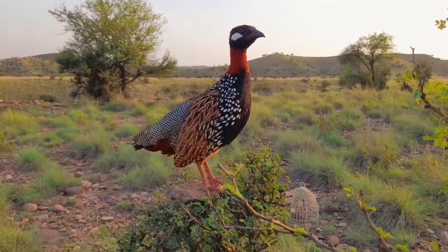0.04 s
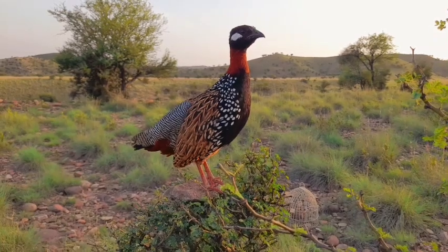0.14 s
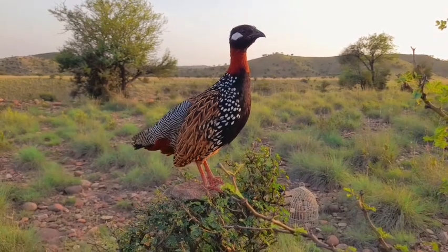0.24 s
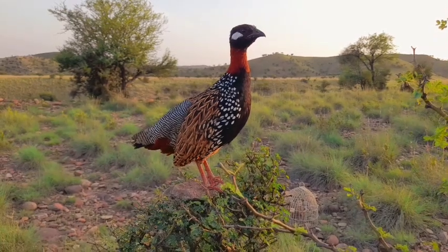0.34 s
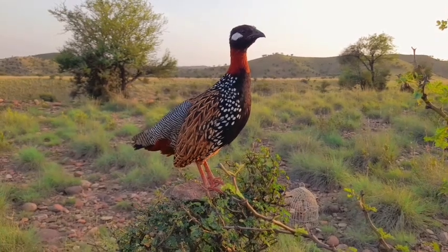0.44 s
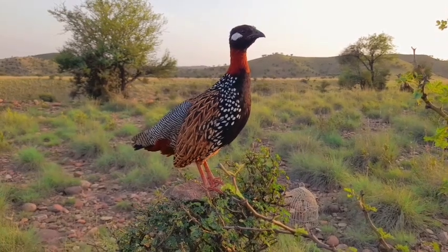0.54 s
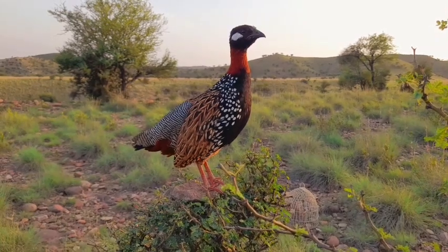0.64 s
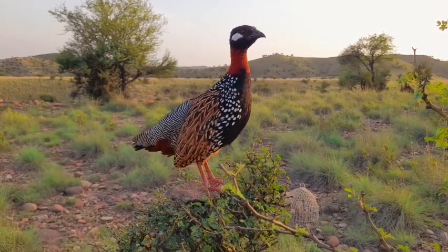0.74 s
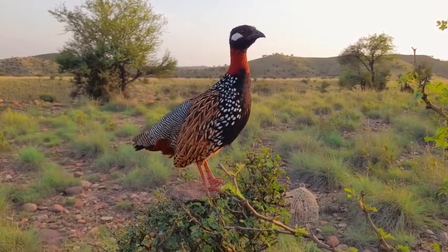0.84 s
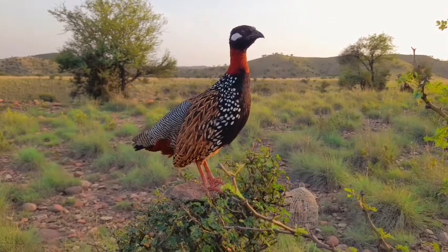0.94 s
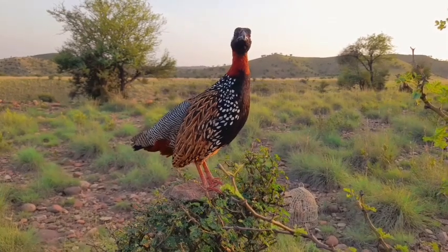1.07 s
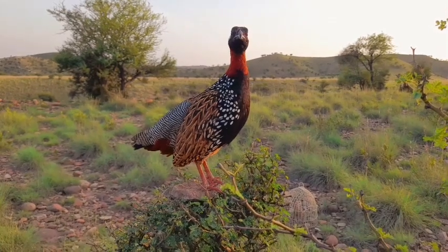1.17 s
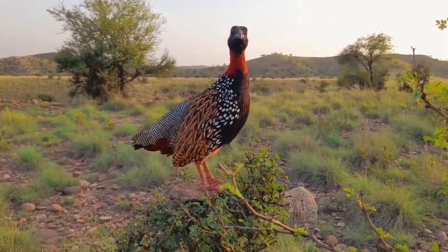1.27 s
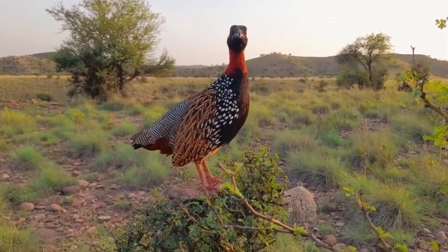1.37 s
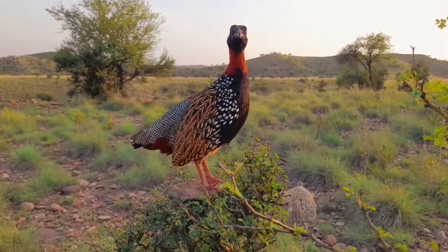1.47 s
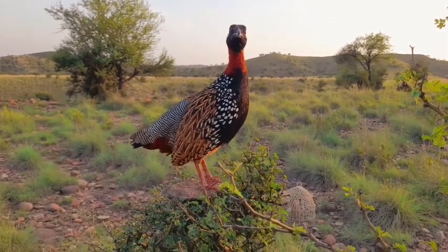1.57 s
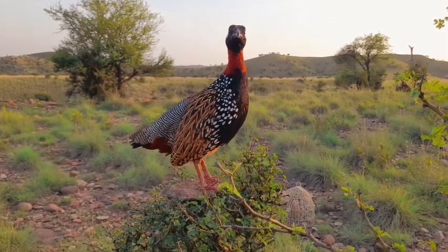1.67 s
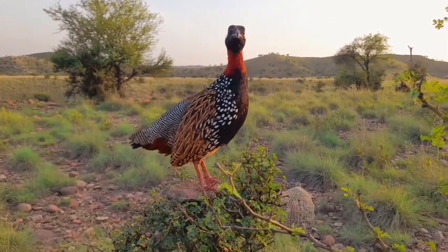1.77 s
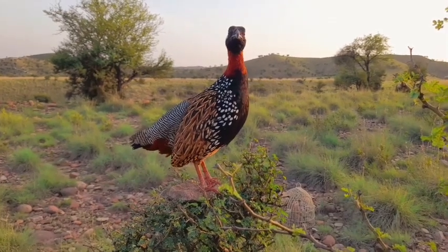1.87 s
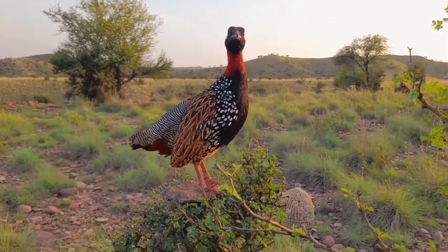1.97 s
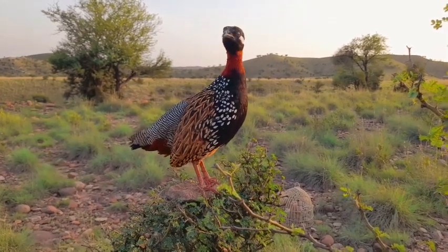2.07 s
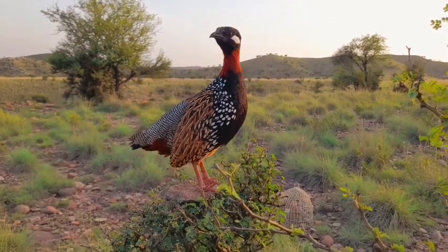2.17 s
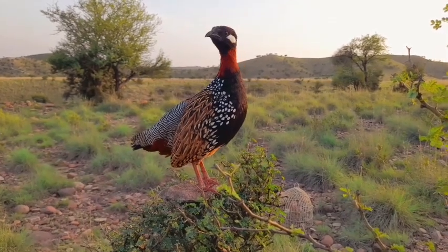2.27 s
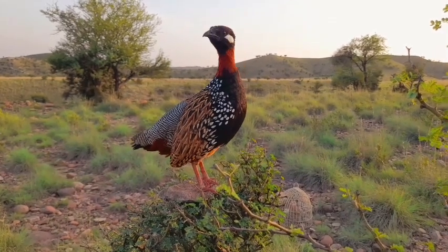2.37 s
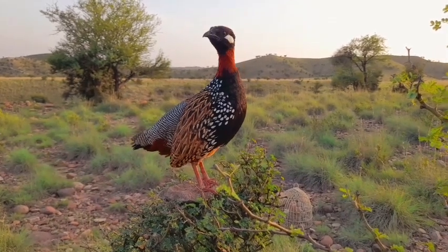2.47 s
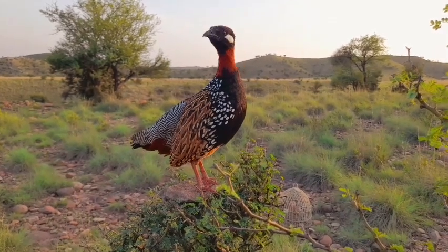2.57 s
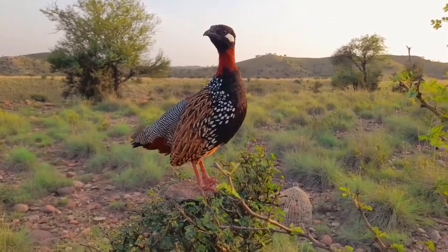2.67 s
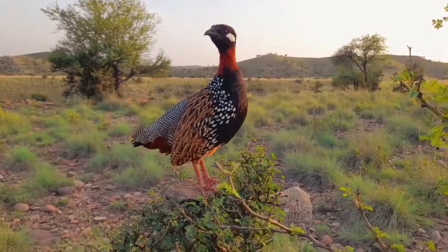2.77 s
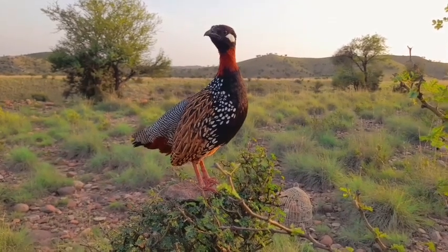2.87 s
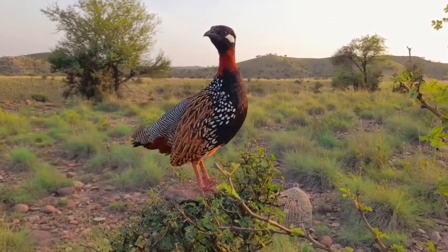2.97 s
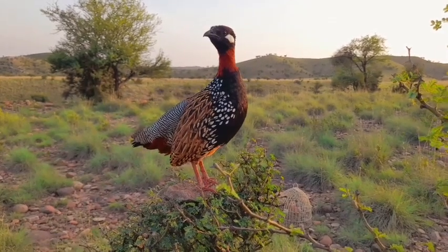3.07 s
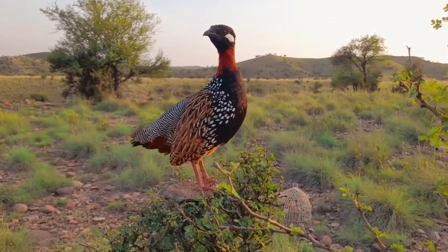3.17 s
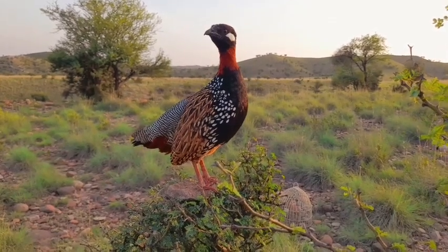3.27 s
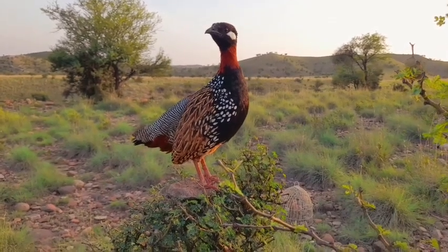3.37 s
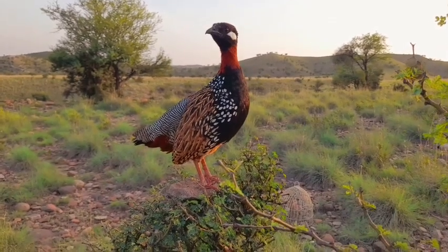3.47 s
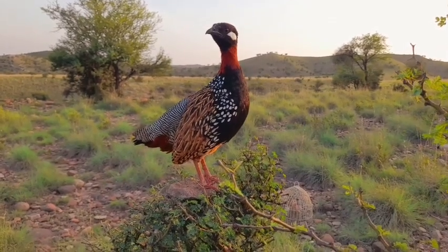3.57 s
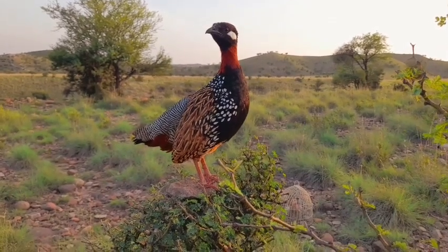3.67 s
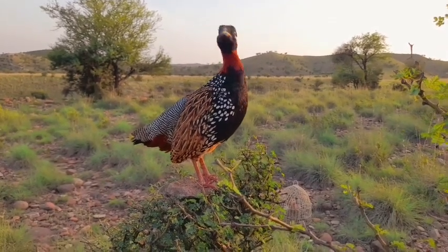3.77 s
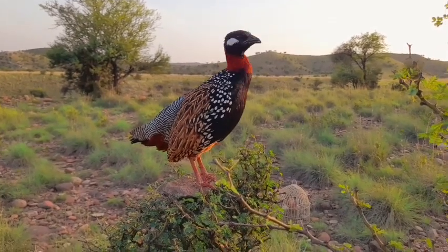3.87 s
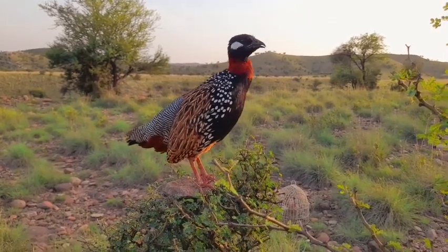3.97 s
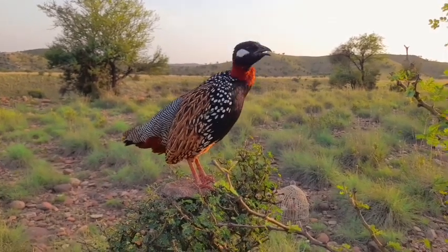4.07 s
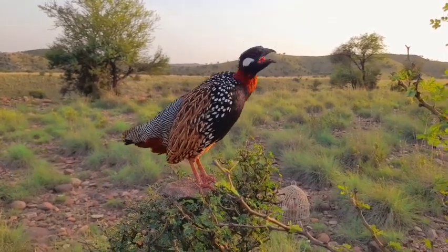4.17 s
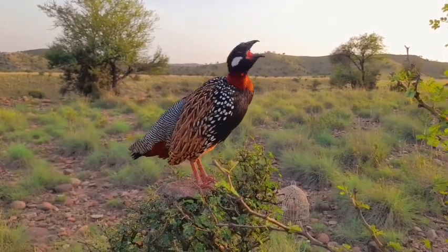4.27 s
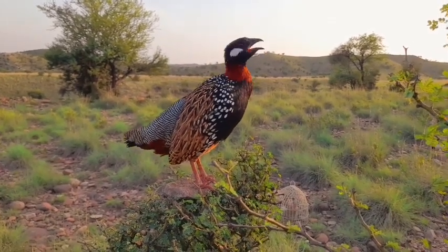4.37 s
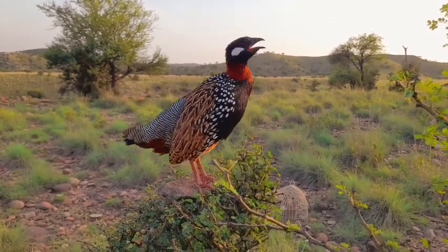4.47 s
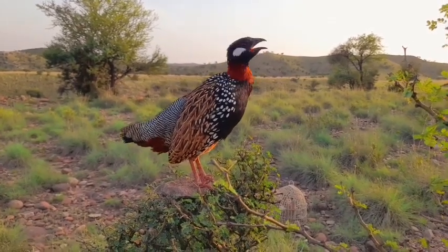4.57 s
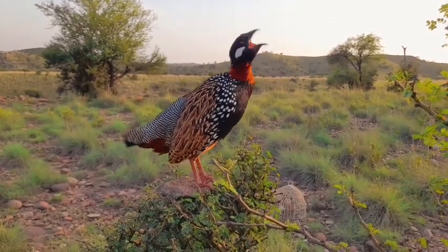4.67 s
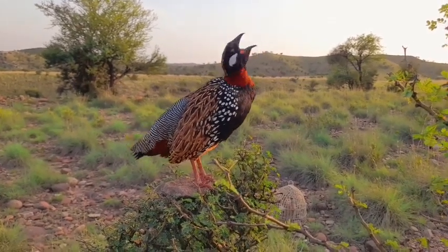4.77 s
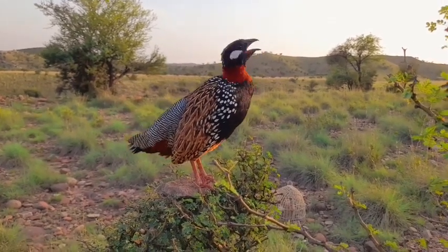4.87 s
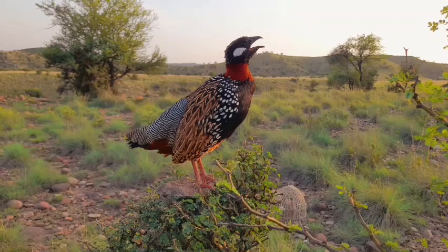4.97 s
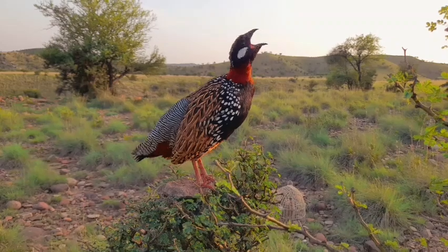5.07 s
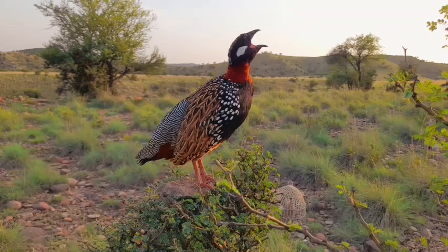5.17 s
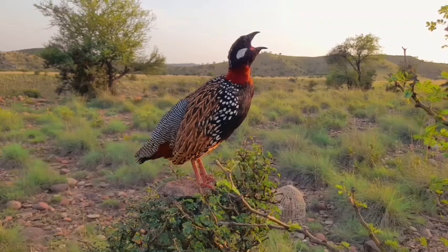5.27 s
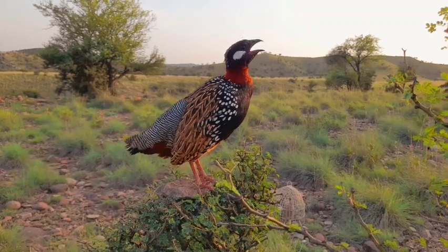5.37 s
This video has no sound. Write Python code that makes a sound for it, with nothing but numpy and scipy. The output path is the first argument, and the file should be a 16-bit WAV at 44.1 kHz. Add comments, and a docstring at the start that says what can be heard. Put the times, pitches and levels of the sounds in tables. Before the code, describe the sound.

Outdoors in dry open scrub, a faint low wind rumble, stronger on the left, flutters on the microphones over soft hiss, tiny insect ticks and distant whistles, hoots and twitter. Around four seconds two faint dry rustles pass, then a close francolin calls: two clipped piercing chips, a muted grunt and two loud grating rasps with a short, dry open-air tail.

```python
"""Light wind rumbles on two microphone ports over faint hiss, ticking, distant whistles, twitter and hoots.
After two dry rustles a black francolin calls close by: two clipped chips, a soft grunt, two grating rasps.
Wind, hiss and rustles are coloured noise; the insect and far birds are gliding sines.
The francolin's voice is a shrill tone swept by a flutter in the syrinx some 270 times a second in the rasps,
beside a steadier tone; throat, beak, perch and scrub colour it."""
import sys
import numpy as np
from scipy import signal
from scipy.fft import rfft, irfft
from scipy.io import wavfile
from scipy.ndimage import uniform_filter1d

SR = 44100
rng = np.random.default_rng(int(sys.argv[2]) if len(sys.argv) > 2 else 0)


def wav_out(sig):
    """Save sig, one row per channel (or a flat mono array), as 16-bit PCM at SR to the path in sys.argv[1]."""
    wavfile.write(sys.argv[1], SR, np.round(np.clip(np.atleast_2d(sig).T, -1, 1) * 32767).astype(np.int16))


N = 238831
TIME = np.arange(N) / SR
FFT_SIZE = 2 ** 18
TOP_HZ = 15600

# spectrum of the still air over the plain: frequency_hz, level_db
STILL_AIR_COLOUR = [(100, -20), (500, -0.5), (1000, -2), (2500, -7.5), (4000, -5), (6300, -5), (7800, -18),
                    (10000, -9.5), (13500, -3.5), (15500, -9)]
# spectrum of the wind's rumble: frequency_hz, level_db
WIND_COLOUR = [(12, -50), (20, -19), (64, 2.5), (106, 6), (236, -15), (305, -15), (792, -45.5),
               (900, -43.5), (1170, -79), (1980, -120)]
# breeze on the ports between gusts, before the port gain: time_s, level_db
BREEZE = [(0.0, -52.5), (0.3, -46), (0.62, -61), (0.84, -67), (0.98, -60), (1.16, -53), (1.31, -48.5),
          (1.69, -50.5), (1.99, -71), (2.23, -55), (2.43, -53), (3.06, -49.5), (3.16, -41.5), (3.62, -56.5),
          (4.07, -49.5), (4.79, -62.5), (4.93, -69), (5.41, -74)]
# gusts, timed between half-heights, before the gust and port gains: start_s, length_s, level_db
GUSTS = [(0.184, 0.018, -47), (0.243, 0.047, -45.5), (0.432, 0.027, -34.5), (0.542, 0.04, -43),
         (0.64, 0.037, -45), (0.774, 0.11, -46.5), (0.905, 0.28, -38.5), (1.232, 0.13, -39),
         (1.544, 0.029, -40), (1.678, 0.099, -48.5), (2.356, 0.036, -38.5), (2.493, 0.017, -34.5),
         (2.681, 0.076, -37.5), (3.008, 0.31, -38.5), (3.48, 0.071, -34.5), (3.618, 0.041, -36),
         (3.735, 0.039, -40), (3.863, 0.19, -38), (4.183, 0.085, -43)]
GUST_RISE_S, GUST_FALL_S = .016, .035
TICK_S = .012
# distant birds' gliding whistles and calls: start_s, length_s, start_hz, middle_hz, end_hz, level_db
WHISTLES = [(0.043, 0.21, 3990, 3530, 3420, -77.5), (0.872, 0.14, 4400, 3800, 2960, -78.5),
            (1.073, 0.15, 5770, 6420, 6100, -74), (1.233, 0.031, 3350, 2690, 2720, -60),
            (1.375, 0.14, 4420, 3640, 3230, -75.5), (1.394, 0.047, 2720, 2567, 3200, -55.5),
            (1.495, 0.024, 1770, 1980, 2260, -62), (1.528, 0.019, 3110, 2960, 2920, -52),
            (1.562, .016, 1940, 1935, 1830, -60.5), (1.573, 0.17, 3300, 3850, 4660, -73),
            (1.64, 0.04, 1780, 2370, 2260, -62.5), (1.684, 0.039, 2400, 2023, 2500, -53.5),
            (1.405, 0.23, 531, 599, 743, -70.5), (1.837, 0.066, 4700, 4060, 3880, -84),
            (1.97, .09, 3800, 3640, 2630, -85), (2.442, 0.14, 3360, 3240, 2770, -77.5),
            (2.728, 0.13, 2900, 2790, 2750, -85), (3.12, 0.2, 3800, 3550, 3400, -85),
            (3.904, 0.099, 4340, 4250, 3780, -75.5)]
# far-off hoots on one note: start_s, length_s, level_db
HOOTS = [(0.052, .13, -72.5), (0.45, 0.16, -76.5), (1.46, 0.18, -73), (1.812, 0.2, -73.5),
         (1.98, 0.32, -83), (2.21, 0.18, -73.5)]
HOOT_HZ, HOOT_EDGE_S = 972, .052
# bursts of scratchy twitter: start_s, length_s, middle_hz, level_db
TWITTER = [(0.218, 0.14, 3950, -69), (0.432, 0.34, 4800, -77.5), (0.722, 0.094, 4700, -72),
           (0.876, 0.077, 4540, -73), (1.172, .06, 3400, -64.5), (1.226, 0.21, 3980, -68),
           (2.229, 0.21, 4330, -67.5), (2.844, .18, 4370, -74.5), (3.258, 0.16, 4470, -70),
           (4.035, 0.12, 4130, -71.5)]
# dry rustles: start_s, length_s, level_db
RUSTLES = [(3.719, 0.12, -62), (3.818, 0.083, -62.5)]
# the two clipped chips, before the throat: start_s, length_s, first_hz, last_hz, level_db, roughness
CHIPS = [(4.228, .0205, 3542, 2019, -4.5, .14), (4.2629, .0385, 4407, 3100, -3, .9)]
CHIP_ATTACK_S, CHIP_RELEASE_S = .0045, .0059
# a chip's pitch cracks downward: place and width (shares of its length), and added roughness
CRACK_AT, CRACK_WIDTH, CRACK_ROUGH = .46, .11, .5
# flips into a pure high register, before the throat: start_s, length_s, top_hz, level_db
SQUEAKS = [(4.265, .0322, 6698, -6.5), (5.2638, .0248, 6260, -13.5)]
# a squeak scoops up to its top and sags at the end; an opening push soon fades
SCOOP_HZ, SAG_HZ, BEND_S = 848, 351.7, .0042
FLIP_S, PUSH_DB, PUSH_S = .0012, 7, .012
# the soft grunt, beak nearly shut: time_s, pitch_hz, level_db, roughness (0-1)
GRUNT = [(4.497, 1790, -58, .5), (4.509, 1890, -41.5, .3), (4.517, 1895, -34.5, 0.2),
         (4.526, 1830, -43.5, .35), (4.538, 1638, -30, .05), (4.546, 1377, -35.5, .05),
         (4.553, 1217, -49, .2), (4.564, 1050, -62, 0.3)]
# the two rasps, one curve each: time_s, lowest_pitch_hz, flutter_rate_hz
RASPS = [
    [(4.722, 2350, 244.2), (4.742, 2630, 246.1), (4.77, 2800, 264.6), (4.825, 2870, 261.5),
     (4.855, 2980, 211), (4.865, 2700, 206.3), (4.882, 1300, 205)],
    [(5.058, 1251, 299.9), (5.112, 2820, 297.6), (5.15, 2730, 268.1), (5.205, 2590, 266),
     (5.26, 2440, 272.5), (5.303, 2170, 207), (5.326, 1300, 206.5)],
]
# a rasp at full tension, before the throat: pitch, level, upward sweep (share of pitch), roughness
TAUT_HZ, RASP_DB, SWEEP, TAUT_ROUGH = 2876, -6.5, 1.16, .05
# slackening softens and roughens a rasp (roughness an octave below full tension); it also tires
SLACK_DB_PER_OCTAVE, SLACK_ROUGH, TIRING_DB_PER_S = 11, 1.7, 7
RASP_ATTACK_S, RASP_RELEASE_S = .0043, .006
# resonances of throat and open beak, before the voice gain: frequency_hz, level_db
THROAT = [(600, -60.5), (1400, -10), (2250, -17.5), (2800, -1), (3500, -3.5), (4200, 1), (5000, -3.5),
          (5700, -1), (6700, -6), (7700, -20), (9200, -0.5), (11500, -5.5), (13500, 1.5), (15500, -15)]
# colour of the air rushing through the beak: frequency_hz, level_db
AIR_COLOUR = [(100, -19.5), (400, -1), (1000, -3), (1700, 7.5), (5000, -2.5), (6800, -9), (7800, -26),
              (9200, 0), (12000, 9), (15000, -11.5)]
# how the two ports hear the bird: frequency_hz, left_minus_right_db, left_lead_rad
PORTS = [(970, -1, 1.5), (2800, 1, 0.2), (4200, 0, 0.5), (5500, -5, 0), (6900, -6, 1.5), (9600, -1, 2),
         (11460, -3.5, 0.5), (15500, -2, 9)]


def undb(db):
    """Amplitude is ten to the power of decibels over twenty."""
    return 10 ** (np.asarray(db) / 20)


def unit(x):
    """Normalisation scales a signal to an rms of 1."""
    return x / np.sqrt(np.mean(x ** 2))


def curves(rows):
    """Linear interpolation turns a time table's columns into control signals."""
    s, *columns = np.transpose(rows)
    return [np.interp(TIME, s, column) for column in columns]


def across(rows):
    """Interpolation on a logarithmic frequency axis spreads a table's columns over the bins."""
    hz, *columns = np.transpose(rows)
    bin_hz = np.arange(FFT_SIZE // 2 + 1) * SR / FFT_SIZE
    log_bins = np.log(bin_hz + 1)  # the 1 keeps the bin at 0 Hz finite
    return [np.interp(log_bins, np.log(hz), column) for column in columns]


def filtered(x, response):
    """Linear filtering multiplies the spectrum by a frequency response."""
    return irfft(rfft(x, FFT_SIZE) * response)[..., :N]


def rounded(response):
    """A moving average over frequency rounds the corners of a response."""
    return uniform_filter1d(response, size=1500, axis=-1)


def noise(colour, channels=1):
    """White noise shaped by a spectrum becomes coloured noise of rms 1."""
    white = rng.standard_normal((channels, N))
    return unit(filtered(white, undb(across(colour)[0])))


def walk(rate):
    """Twice-averaged noise wanders smoothly, about `rate` turns a second, with rms 1."""
    size = max(int(SR / rate), 1)
    once = uniform_filter1d(rng.standard_normal(N), size)
    return unit(uniform_filter1d(once, size))


def swell(start, length):
    """A half sine makes a rounded rise and fall."""
    return np.sin(np.pi * np.clip((TIME - start) / length, 0, 1))


def gate(start, length, attack_s, release_s):
    """Linear ramps give attack, hold and release between 0 and 1."""
    rise = (TIME - start) / attack_s
    fall = (start + length - TIME) / release_s
    return np.clip(np.minimum(rise, fall), 0, 1)


def during(rows, edge_s=.0011):
    """A trapezoid holds 1 from a table's first row to its last, with soft edges outside."""
    inside = np.minimum(TIME - rows[0][0], rows[-1][0] - TIME)
    return np.clip(inside / edge_s + 1, 0, 1)


def cycle(hz):
    """Phase is the running sum of frequency."""
    return 2 * np.pi * np.cumsum(hz) / SR


def delayed(x, seconds):
    """A longer path makes the same sound arrive later."""
    return np.interp(TIME - seconds, TIME, x, left=0)


def still_air(level_db=-71.5):
    """Stationary random pressure is heard as a faint even hiss."""
    return undb(level_db) * noise(STILL_AIR_COLOUR, channels=2)


def wind(port_db=3, flicker_db=3, gust_db=-.33, swirl_db=-12.5, swirl_growth=.6, brisk_db=-38):
    """Turbulent eddies rumble on each port, the windward left one louder; gusts add finer swirls."""
    gusts = 0
    for start, length, db in GUSTS:
        shape = gate(start - GUST_RISE_S / 2, length + (GUST_RISE_S + GUST_FALL_S) / 2,
                     GUST_RISE_S, GUST_FALL_S)
        gusts = gusts + undb(db + gust_db) * shape
    breeze = undb(curves(BREEZE)[0])
    strength = np.hypot(breeze, gusts) * undb(flicker_db * walk(19))
    # finer swirls grow faster than the wind's strength
    swirl_level = undb(swirl_db) * (strength / undb(brisk_db)) ** swirl_growth
    swirl_colour = [(80, -14), (170, .5), (300, -7), (600, -28), (1200, -70)]
    swirls = swirl_level * noise(swirl_colour, channels=3)
    left, right, common = noise(WIND_COLOUR, channels=3) + swirls
    ports = np.array([left + .3 * common, undb(-7.5) * (right + .3 * common)])
    return undb(port_db) * strength * ports


def insect(top_hz=6450, fall_hz=650, level_db=-75, period_s=.098):
    """Periodic falling sine pulses make pairs of tiny ticks, about ten pairs a second."""
    ticks = 0
    for first_s in (.048, .065):
        progress = np.clip((TIME - first_s) % period_s / TICK_S, 0, 1)
        ticks = ticks + np.sin(np.pi * progress) * np.sin(cycle(top_hz - fall_hz * progress))
    return undb(level_db) * ticks


def whistles(warble=.017):
    """Frequency modulation along a parabola gives thin gliding whistles with a slight warble."""
    out, quiver = np.zeros(N), 1 + warble * walk(250)
    for start, length, first_hz, middle_hz, last_hz, db in WHISTLES:
        progress = np.linspace(0, 1, int(length * SR))
        onset = int(start * SR)
        span = slice(onset, onset + len(progress))
        glide = np.polyfit([0, .5, 1], [first_hz, middle_hz, last_hz], 2)
        hz = np.polyval(glide, progress) * quiver[span]
        envelope = np.sin(np.pi * progress) ** .52
        out[span] += undb(db) * np.sqrt(2) * envelope * np.sin(cycle(hz))
    return out


def hoots(waver=.018):
    """A gated, slightly wavering sine makes soft hoots on one note."""
    level = sum(undb(db) * gate(start, length, HOOT_EDGE_S, HOOT_EDGE_S) for start, length, db in HOOTS)
    return level * np.sin(cycle(HOOT_HZ * (1 + waver * walk(78))))


def twitter(fall=.18, flicker_db=4, dart_share=.085, scratch_share=.067):
    """Random frequency modulation makes hurried chatter whose pitch sinks through each burst."""
    dart = 1 + dart_share * walk(130) + scratch_share * walk(900)
    flicker = unit(undb(flicker_db * walk(110)))
    out = 0
    for start, length, hz, db in TWITTER:
        sink = 1 + fall * (.5 - np.clip((TIME - start) / length, 0, 1))
        out = out + undb(db) * swell(start, length) * np.sin(cycle(hz * sink * dart))
    return np.sqrt(2) * flicker * out


def songbirds(echo_db=-5, echo_t60=.35):
    """Convolution with decaying noise blurs the whistles, hoots and twitter as distance does."""
    calls = whistles() + hoots() + twitter()
    decay = 10 ** (-3 * TIME[:SR] / echo_t60)  # falls 60 dB in echo_t60 seconds
    blur = unit(rng.standard_normal((2, SR)) * decay) / np.sqrt(SR)
    return calls + undb(echo_db) * signal.fftconvolve(calls[None], blur, axes=1)[:, :N]


def rustles():
    """Swelling broadband noise is heard as two dry rustles."""
    colour = [(1000, -2), (4000, -7.5), (6200, 2.5), (7800, -16), (10500, -2.5), (15000, -4.5)]
    level = sum(undb(db) * swell(start, length) for start, length, db in RUSTLES)
    return level * noise(colour, channels=2)


def chip(start, length, first_hz, last_hz, db, rough):
    """A sudden pitch drop without flutter: (pitch, sweep, loudness, roughness)."""
    fallen = .5 + .5 * np.tanh(((TIME - start) / length - CRACK_AT) / CRACK_WIDTH)
    pitch = first_hz + (last_hz - first_hz) * fallen
    loudness = undb(db) * gate(start, length, CHIP_ATTACK_S, CHIP_RELEASE_S)
    roughness = rough + CRACK_ROUGH * np.sin(np.pi * fallen)  # roughest in mid-crack
    return np.array([pitch, np.zeros(N), loudness, roughness]) * (loudness > 0)


def squeak(start, length, top_hz, db, rough=.026):
    """A high register bends at onset and end, without flutter: (pitch, sweep, loudness, roughness)."""
    age = np.clip(TIME - start, 0, length)
    flat_hz = SCOOP_HZ * np.exp(-age / BEND_S) + SAG_HZ * np.exp((age - length) / BEND_S)
    loudness = undb(db + PUSH_DB * np.exp(-age / PUSH_S))
    return np.array([top_hz - flat_hz, np.zeros(N), loudness, np.full(N, rough)])


def grunt(chaos=.13, overtone_db=-31, husk_db=-2,
          under_hz=1400, under_db=-38, under_at_s=4.513, under_s=.031):
    """Irregular vibration and noise roughen a low falling note; a second tone sounds briefly beneath."""
    hz, db, rough = curves(GRUNT)
    phase = cycle(hz * (1 + chaos * rough * walk(680)))
    tone = np.sin(phase) + undb(overtone_db) * (np.sin(2 * phase) + .5 * np.sin(3 * phase))
    under = undb(under_db) * swell(under_at_s, under_s) * np.sin(2 * np.pi * under_hz * TIME)
    husk_colour = [(700, -24), (1300, -6.5), (1900, 3.5), (2500, -11), (4200, -22.5), (7000, -40)]
    husk = 2 * undb(husk_db) * rough * noise(husk_colour)[0]
    return (np.sqrt(2) * tone + husk) * undb(db) * during(GRUNT) + np.sqrt(2) * under


def rasp(rows):
    """Membrane tension sets a fluttering note's pitch, sweep, loudness and roughness."""
    start, end = rows[0][0], rows[-1][0]
    low, _ = curves(rows)
    slack = np.maximum(np.log2(TAUT_HZ / low), 0)  # octaves below full tension
    db = RASP_DB - SLACK_DB_PER_OCTAVE * slack - TIRING_DB_PER_S * (TIME - start)
    loudness = undb(db) * gate(start, end - start, RASP_ATTACK_S, RASP_RELEASE_S)
    roughness = TAUT_ROUGH + np.minimum(SLACK_ROUGH * slack ** 2, 1)
    return np.array([low, SWEEP * low, loudness, roughness]) * (loudness > 0)


def phrase():
    """One voice takes chips and rasps in turn, yielding to each squeak: the four control signals."""
    controls = sum(chip(*row) for row in CHIPS) + sum(rasp(rows) for rows in RASPS)
    for row in SQUEAKS:
        start, length = row[:2]
        controls = controls + gate(start, length, FLIP_S, FLIP_S) * (squeak(*row) - controls)
    return controls


def syrinx(controls, lean=.21, chaos=.21, shake=.38, overtone_db=-15, clap_hz=2800, shrill_db=-19,
           third_db=-7, rate_jitter=.0058, sweep_jitter=.008, limp=.037, throb=.05):
    """Fast frequency modulation sweeps a shrill membrane tone; returns it and the flutter's phase."""
    low, sweep, loudness, rough = controls
    _, rate = curves(sum(RASPS, []))
    flutter = cycle(rate * (1 + rate_jitter * walk(250)))
    # the pitch lingers at the bottom of each flutter and darts through the top
    rise = (.5 + .5 * np.sin(flutter + lean * np.sin(flutter))) ** 1.7
    # the flutter limps in groups of three, which makes the note grate
    triplet = np.sin(flutter / 3)
    rise = rise * (1 + sweep_jitter * walk(300) + limp * triplet)
    hz = np.maximum((low + sweep * rise) * (1 + chaos * rough * walk(2200)), 1)
    phase = cycle(hz)
    # slack membranes clap together, so low notes are rich in overtones
    rich = np.clip(undb(overtone_db) * (clap_hz / hz) ** 3 + undb(shrill_db), 0, .9)
    upper = rich ** 2 * np.sin(3 * phase) + rich ** 3 * np.sin(4 * phase)
    tone = np.sin(phase) + rich * np.sin(2 * phase) + undb(third_db) * upper
    uneven = 1 + shake * rough * walk(2500) + throb * triplet * sweep / TAUT_HZ
    return np.sqrt(2) * tone * uneven * loudness, flutter


def held_tone(controls, flutter, interval=1.055, level_db=-7, overtone_db=-4, tug=.93, chop=.15, chaos=.13):
    """Phase and amplitude modulation tug a steadier tone that swells at the bottom of each flutter."""
    low, sweep, loudness, rough = controls
    phase = cycle(interval * low * (1 + chaos * rough * walk(2200))) + tug * np.sin(flutter)
    tone = np.sin(phase) + undb(overtone_db) * np.sin(2 * phase)
    swelling = 1 - chop * np.sin(flutter)
    # without sweep there is no held tone, so it sounds in the rasps only
    return np.sqrt(2) * undb(level_db) * loudness * sweep / TAUT_HZ * swelling * tone


def breath(flutter, air_db=-30, air_spread=1, puff=.39, buzz_db=-46):
    """The flutter chops the airflow into puffs of hiss and a faint low buzz."""
    hiss = noise(AIR_COLOUR) + air_spread * noise(AIR_COLOUR, channels=2)
    air = undb(air_db) * (1 + puff * np.sin(flutter)) * hiss
    buzz = np.sin(flutter) + 1.1 * np.sin(2 * flutter) + .4 * np.sin(3 * flutter)
    return air + undb(buzz_db) * buzz


def francolin(voice_db=-1, perch_s=.00072, perch_db=-15):
    """Resonance in throat and beak and a reflection off the perch shape the voice at both ports."""
    controls = phrase()
    loudness = controls[2]
    shrill, flutter = syrinx(controls)
    throat = rounded(undb(across(THROAT)[0] + voice_db))
    voice = filtered(shrill + held_tone(controls, flutter), throat)
    voice = voice + undb(perch_db) * delayed(voice, perch_s) + grunt()
    pan_db, lead = rounded(np.array(across(PORTS)))
    side = np.array([[.5], [-.5]])  # half the difference to each port
    port_response = undb(side * pan_db) * np.exp(1j * side * lead)
    return filtered(voice + loudness * breath(flutter), port_response)


def scrub(x, near_db=-32, near_t60=.1, far_db=-42, far_t60=.29, ground_db=-29, ground_t60=.05):
    """Scattering: the ground returns a brief spill, the bushes a short tail and a faint longer one."""
    colour = [(500, -13), (2500, 1), (6700, -2), (9000, -9.5), (15000, -21.5)]
    tail = 0
    for db, t60 in [(ground_db, ground_t60), (near_db, near_t60), (far_db, far_t60)]:
        tail = tail + undb(db) * unit(10 ** (-3 * TIME / t60))
    # nothing returns in the first 3 ms
    response = noise(colour, channels=2) * tail * (TIME > .003) / np.sqrt(N)
    return signal.fftconvolve(x, response[:, :SR], axes=1)[:, :N]


def scene():
    """Superposition adds the near bird and its echo to wind and distant life."""
    backdrop = still_air() + wind() + insect() + songbirds() + rustles()
    bird = francolin()
    return backdrop + bird + scrub(bird)


def record(dry):
    """Saturation clips at full scale, then a zero-phase low-pass cuts the top."""
    lowpass = signal.ellip(8, .1, 60, TOP_HZ, fs=SR, output="sos")
    return signal.sosfiltfilt(lowpass, np.clip(dry, -1, 1))


dry = scene()
out = record(dry)
wav_out(out)
```